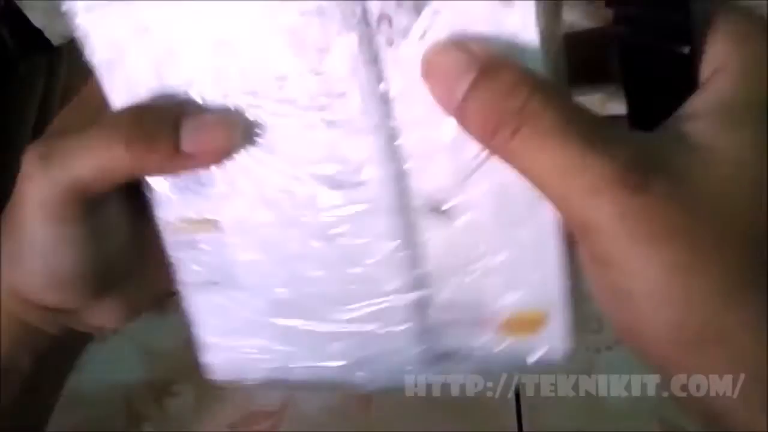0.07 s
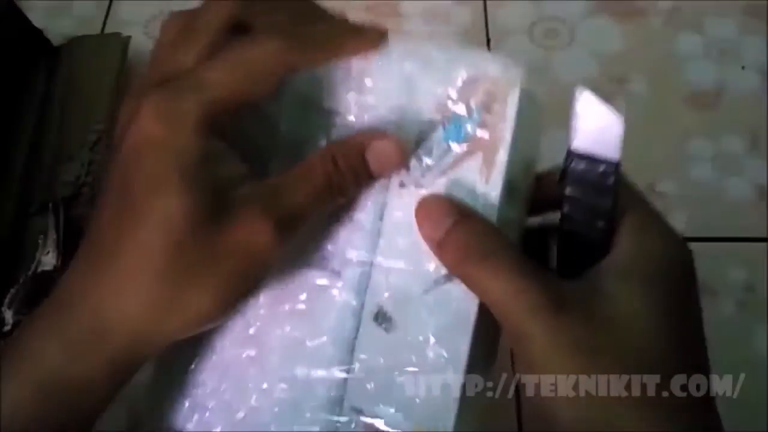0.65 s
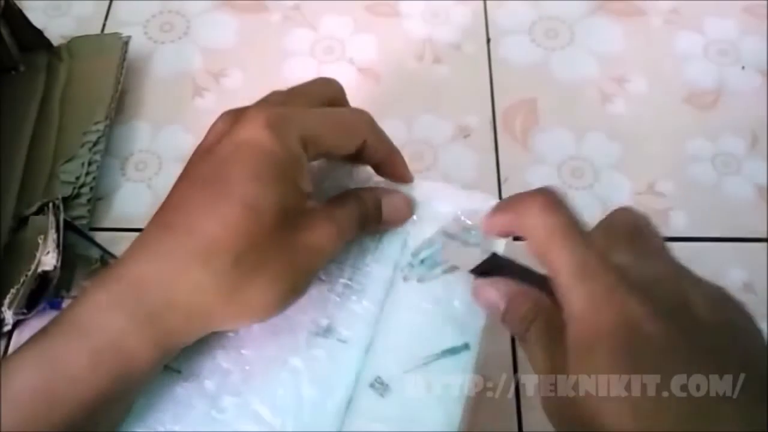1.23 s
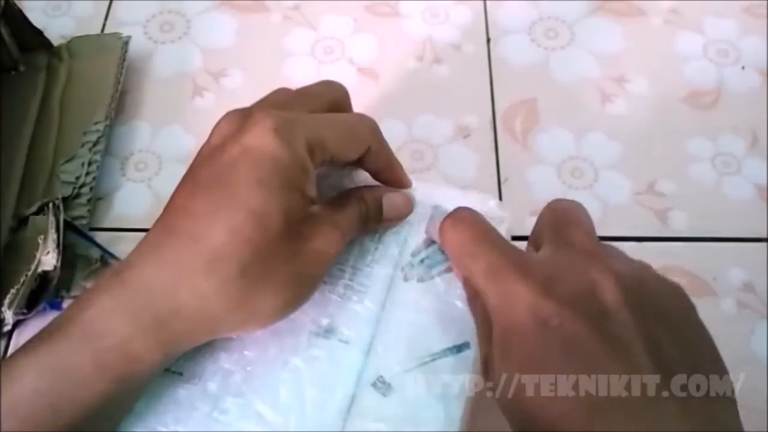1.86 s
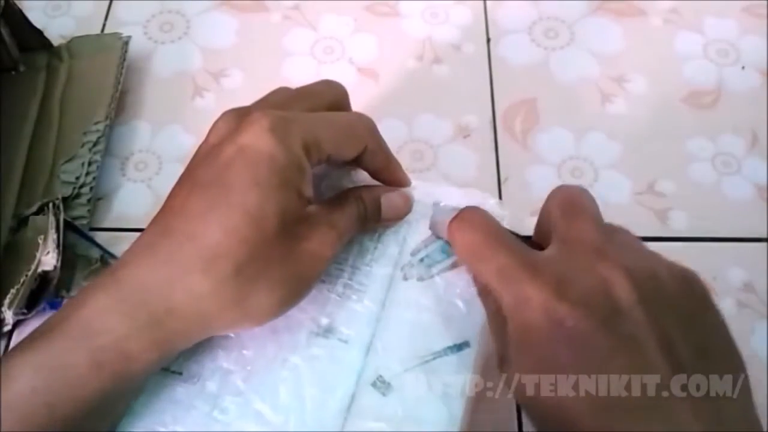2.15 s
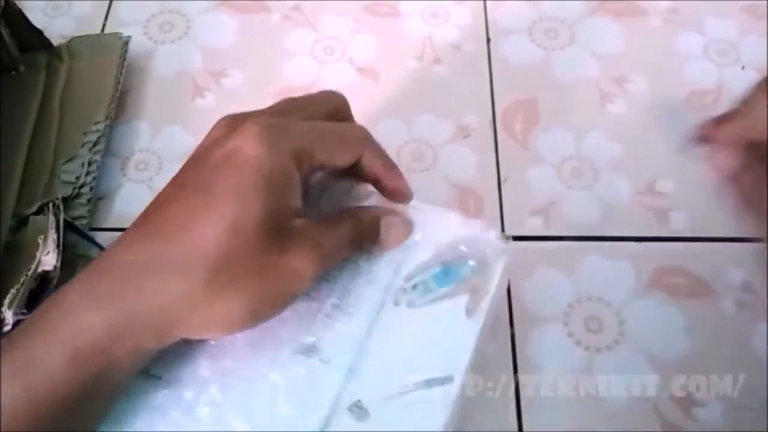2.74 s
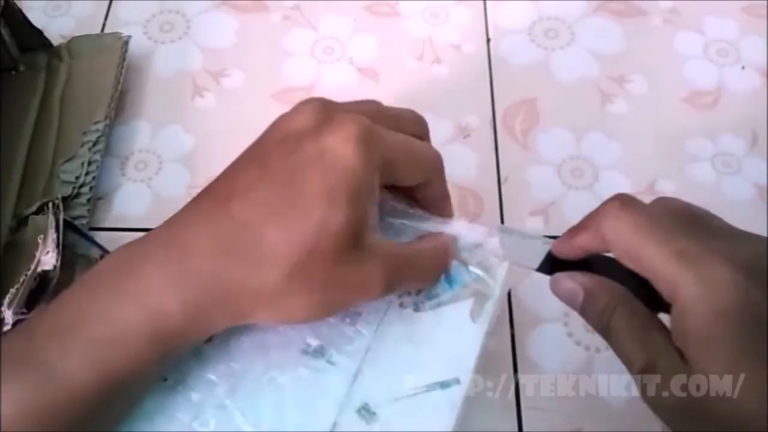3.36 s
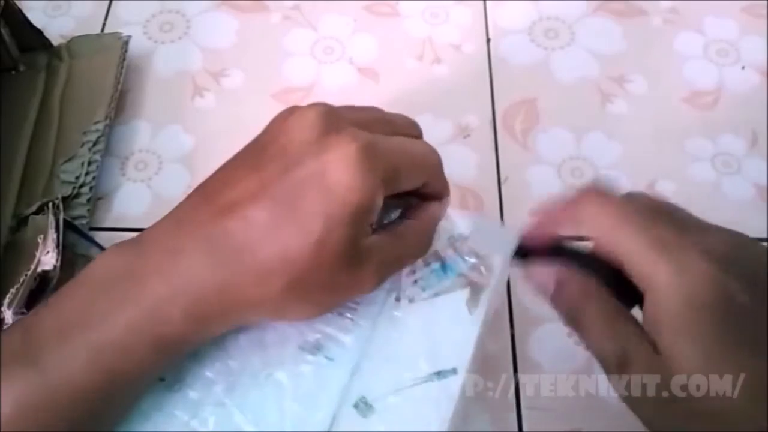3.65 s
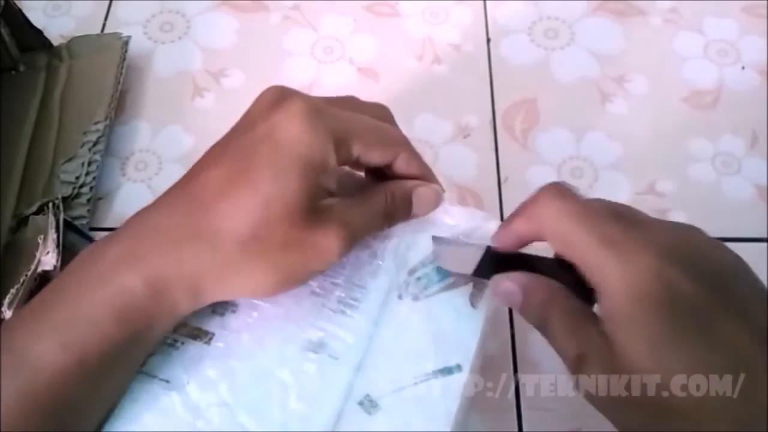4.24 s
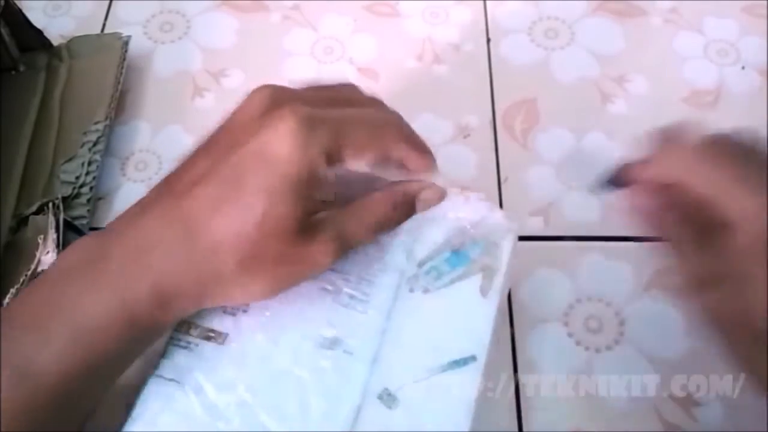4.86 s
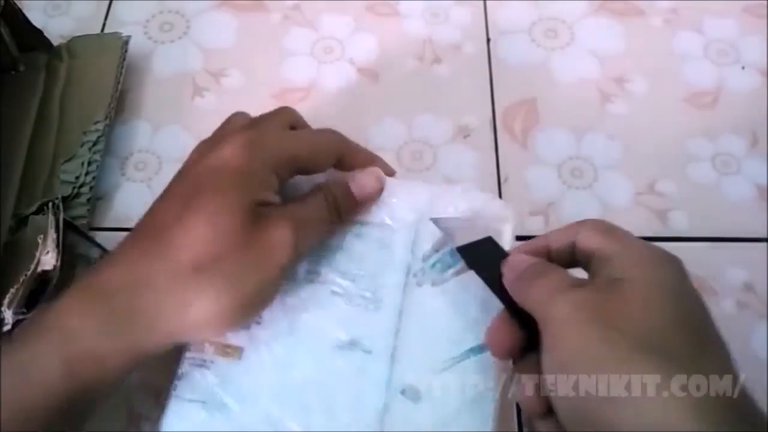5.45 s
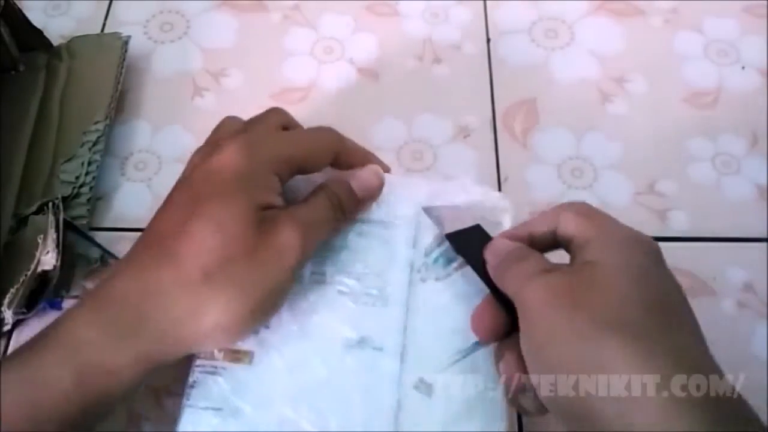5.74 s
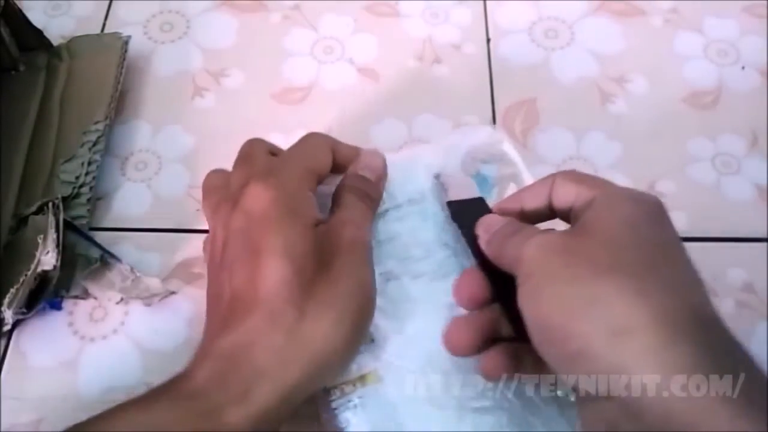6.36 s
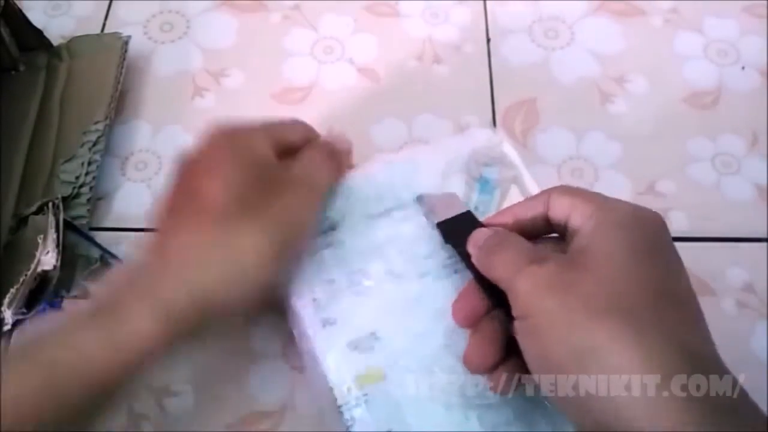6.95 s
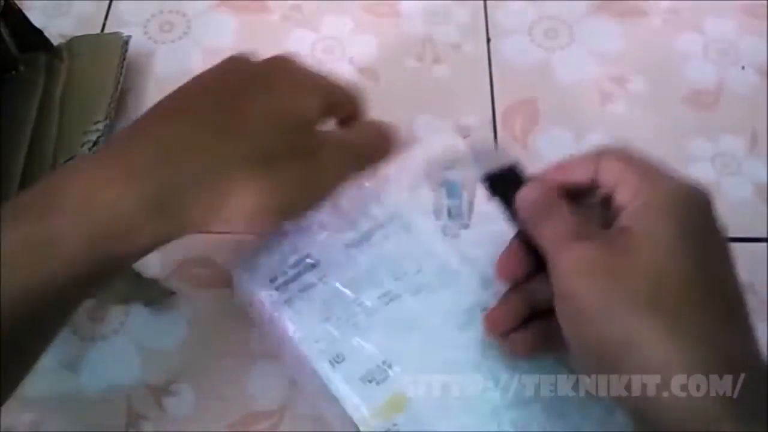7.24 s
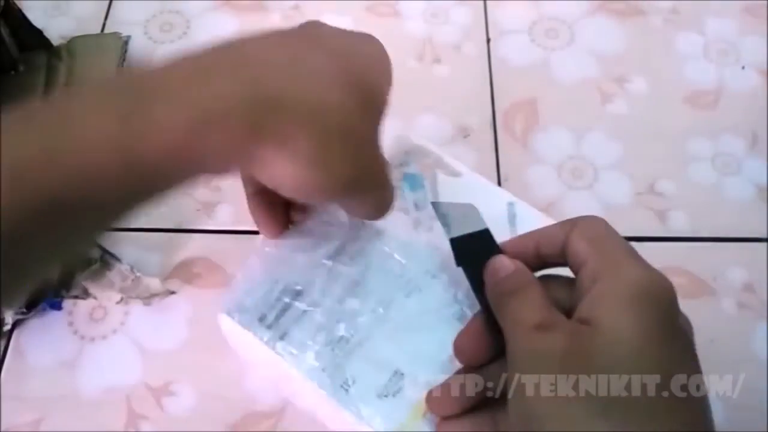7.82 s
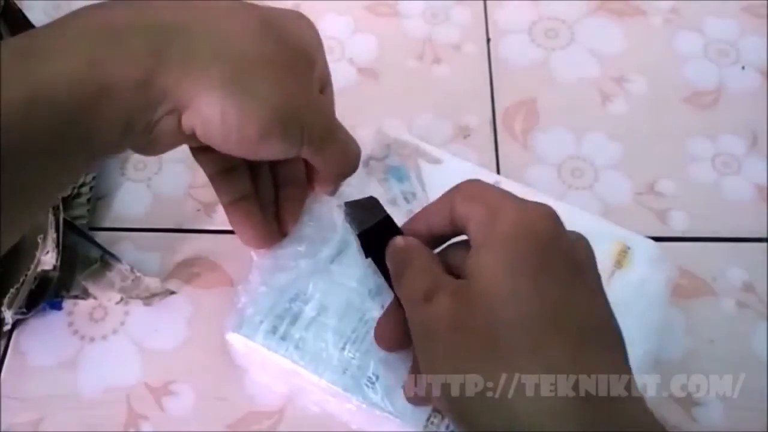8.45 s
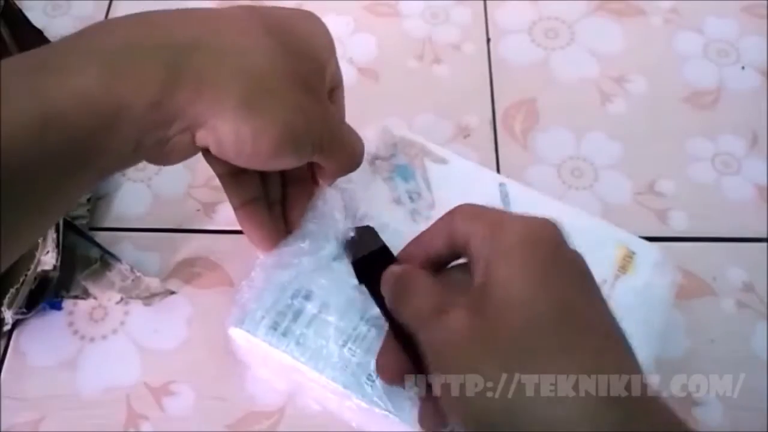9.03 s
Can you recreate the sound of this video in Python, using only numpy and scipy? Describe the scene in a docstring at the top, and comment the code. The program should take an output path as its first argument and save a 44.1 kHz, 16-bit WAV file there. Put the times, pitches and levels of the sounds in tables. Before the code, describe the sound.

Thin plastic wrap crackles in uneven bursts as a parcel is gripped and bumped in a small, hard-walled room. A knife blade sticks and slips through it in brief rasps, and bubbles burst with bright cracks. After a quieter stretch of rubbing and ticking, more pops come with dull knocks from the box. The handling is close, over a faint rumble of distant traffic.

```python
"""Slitting a bubble-wrapped parcel

Hands turn a parcel on a tiled floor and cut its wrap with a craft knife, close to a phone.
The film crinkles, snaps as creases flip and pops as it bursts. The blade sticks and slips in short
rasping strokes, the box thuds, and a small hard room rings. An engine and traffic drone far outside."""
import sys
import numpy as np
from scipy import signal
from scipy.fft import rfft, irfft, next_fast_len
from scipy.io import wavfile
from scipy.ndimage import map_coordinates

SR = 44100
rng = np.random.default_rng(int(sys.argv[2]) if len(sys.argv) > 2 else 0)


def to_wav(s):
    """Save 16-bit WAV."""
    ch = np.atleast_2d(s).T  # columns
    pcm = np.round(np.clip(ch, -1, 1) * 32767)  # PCM
    wavfile.write(sys.argv[1], SR, pcm.astype(np.int16))


N = 400869

TOP_HZ = 13080
LEAD_IN_S = 0.004  # faint hiss before a crack
# film crack: (frequency [Hz], level [dB])
CRACK_SPECTRUM = [(150, -55), (2000, -10), (4000, -5), (6200, -0.5), (7300, 1), (10500, 3.5), (13000, 1)]
# hollow pop: (frequency [Hz], level [dB])
POP_SPECTRUM = [(80, -8.5), (250, -6.5), (700, -1), (1500, 1), (5000, -1.5), (11000, -31)]
# large creases flip: (time [s], relative crack level [dB])
CREASE_FLIPS = [(0.529, -34), (0.851, -23), (1.042, -23.5), (1.686, -35), (1.834, -33.5), (1.851, -27.5),
                (2.161, -30), (2.25, -31.5), (2.316, -29), (2.382, -29.5), (2.92, -31.5), (3.664, -30),
                (3.757, -29.5), (3.783, -26), (3.934, -31.5), (4.01, -27.5), (4.022, -28), (4.133, -29),
                (4.516, -25.5), (4.524, -25), (4.563, -39), (4.613, -32), (4.626, -30.5), (4.695, -19.5),
                (4.774, -28), (5.146, -30), (6.464, -37), (6.538, -30), (6.619, -33), (7.514, -34),
                (7.622, -21), (7.895, -27), (8.002, -24.5), (8.382, -30), (8.713, -20), (8.953, -32.5),
                (8.971, -32)]
# wrap bursts: (time [s], relative crack level [dB], relative pop level [dB], tear time [s], pitch [Hz])
WRAP_BURSTS = [(0.323, -15, -38.5, 0.0011, 3900), (2.604, -13, -28, 0.0012, 2827),
               (2.89, -30, -43.5, 0.003, 2400), (3.453, -12.5, -27, 0.0013, 2600),
               (6.134, -31, -51, 0.0018, 2250), (6.532, -27.5, -39, 0.00085, 2280),
               (6.811, -24.5, -41.5, 0.00055, 3730), (6.827, -25.5, -37.5, 0.0015, 1630),
               (7.613, -16.5, -36, 0.00057, 3150), (7.731, -15.5, -41, 0.0016, 2810),
               (7.74, -15, -50.5, 0.00046, 3950), (8.027, -23, -37.5, 0.00058, 1880),
               (8.704, -20.5, -31, 0.00043, 2050), (8.72, -24.5, -47.5, 0.0029, 1966),
               (9.042, -29.5, -43, 0.00098, 3350)]


def amp(db):
    """Decibels to gain."""
    return 10 ** (np.asarray(db) / 20)


def unit(x):
    """Scale to rms 1."""
    return x / np.sqrt(np.mean(x ** 2) + 1e-20)


def along(points, hz):
    """Interpolate (Hz, value) points on a log axis."""
    f, v = np.transpose(points)
    return np.interp(np.log(hz + 1), np.log(f + 1), v)


def curves(rows):
    """One value per sample for each column after the time."""
    s, *cols = np.transpose(rows)
    return [np.interp(np.arange(N) / SR, s, c) for c in cols]


def wobble(knots_per_s):
    """Smooth random curve."""
    knots = rng.standard_normal(int(N * knots_per_s / SR) + 4)
    return map_coordinates(knots, [np.arange(N) * knots_per_s / SR])


def colour(x, spectrum, size=2048):
    """Minimum-phase filter with the given spectrum."""
    cepstrum = irfft(np.log(amp(along(spectrum, np.fft.rfftfreq(size, 1 / SR)))))
    cepstrum[1:size // 2] *= 2
    cepstrum[size // 2 + 1:] = 0
    impulse = irfft(np.exp(rfft(cepstrum)))
    return signal.fftconvolve(x, impulse[None], axes=1)[:, :x.shape[1]]


def resonate(x, modes):
    """Pass x through resonances: (frequency [Hz], width [Hz], level [dB])."""
    size = next_fast_len(x.shape[1] + SR // 2)
    f = np.fft.rfftfreq(size, 1 / SR)
    body = sum((-1) ** k * amp(db) * 1j * f * width / (hz * hz - f * f + 1j * f * width)
               for k, (hz, width, db) in enumerate(modes))
    return irfft(rfft(x, size) * body, size)[:, :x.shape[1]]


def add(track, s, x):
    """Mix x into the track from time s."""
    start = max(round(s * SR), 0)
    track[:, start:start + x.shape[1]] += x[:, :N - start]


def grains(length, per_s, spread_db):
    """Tiny random slips, mostly weak, different at each microphone."""
    strength = amp(spread_db * np.minimum(rng.exponential(size=length), np.pi))
    slipping = rng.random(length) < per_s / SR
    return unit(slipping * strength * rng.standard_normal((2, length)))


def burst(spectrum, life_s, uneven_db=3, bands=40, size=1024):
    """Flurry of clicks with its own uneven resonances, slightly later on the right."""
    t = np.arange(size) / SR
    flurry = rng.standard_normal((1, size)) * t ** 2 * np.exp(-t / life_s)
    hz = np.geomspace(200, TOP_HZ, bands)
    band_db = along(spectrum, hz) + uneven_db * rng.standard_normal(bands)
    left = colour(flurry, [spectrum[0], *zip(hz, band_db)])[0]
    right = np.roll(left, rng.integers(2, 12))
    return np.array([left, right]) * np.sqrt(SR / 1000) / np.linalg.norm(left)


def in_room(x, left_db, wet_db, wall_s=0.0015):
    """Panned direct sound plus the tiled room's diffuse tail."""
    # room decay: (frequency [Hz], t60 [s])
    room_t60 = [(150, 0.29), (1000, 0.38), (4000, 0.31), (9000, 0.37), (14000, 0.27)]
    hz, t, noise = signal.stft(rng.standard_normal((2, SR // 2)), SR, nperseg=256)
    decay = amp(-60 * t / along(room_t60, hz)[:, None])
    onset = np.clip(t / wall_s - .5, 0, 1)
    tail = signal.istft(noise * decay * onset, SR)[1]
    out = amp(wet_db) * signal.fftconvolve(x, tail / np.linalg.norm(tail[0]), axes=1)
    out[:, :x.shape[1]] += x * amp([[left_db / 2], [-left_db / 2]])
    return out


def moving_in_room(x, left_db, wet_db, block=16384):
    """The sound wanders with the hands: a new room tail for each block."""
    out = np.zeros((2, N))
    for i in range(0, N, block):
        add(out, i / SR, in_room(x[:, i:i + block], left_db, wet_db))
    return out


def effort(attack_s=0.019, release_s=0.015, settle_db=-19.5, settle_s=0.062):
    """Flex and rub in dB: grips swell, hold and let go; the film settles after each crack."""
    # hand grips: (time [s], length [s], relative crinkle level [dB], relative rub level [dB])
    grips = [(0, 1, -55.5, -64.5), (0.5, 0.46, -50, -54.5), (1.143, 0.74, -57, -62.5),
             (2.235, 0.87, -59, -59.5), (2.733, 0.99, -55.5, -60.5), (3.533, 0.16, -41, -67.5),
             (3.771, 0.102, -48.5, -74), (3.983, 0.17, -47, -63), (4.498, 0.25, -50, -68.5),
             (4.778, 0.06, -32, -46), (5.262, 0.72, -63, -90), (5.974, 0.4, -51.5, -61.5),
             (6.393, 0.34, -57, -85), (6.878, 0.46, -52.5, -63), (7.457, 0.77, -54, -57),
             (7.505, 0.061, -44, -60.5), (7.763, 0.064, -38.5, -46), (8.188, 0.537, -63.5, -65),
             (8.95, 0.15, -51, -55.5)]
    t = np.arange(N) / SR
    flex_power, rub_power = np.full(N, amp(-63) ** 2), np.full(N, amp(-67.5) ** 2)  # parcel merely held
    for s, length_s, crinkle_db, rub_db in grips:
        release = np.exp(-np.clip((t - s - length_s) / release_s, 0, 20))
        hold = np.clip((t - s) / attack_s, 0, 1) * release
        flex_power += (amp(crinkle_db) * hold) ** 2
        rub_power += (amp(rub_db) * hold) ** 2
    settling = np.exp(-t[:SR] / settle_s)
    for s, crack_db, *_ in CREASE_FLIPS + WRAP_BURSTS:
        add(flex_power[None], s, (amp(crack_db + settle_db) * settling[None]) ** 2)
    return 10 * np.log10(flex_power), 10 * np.log10(rub_power)


def roughen(x, depth_db=3.5):
    """Random louder and softer patches in the spectrum roughen the sound."""
    spectra = signal.stft(x, nperseg=256)[2]
    patch = np.outer(np.hanning(10), np.hanning(20))
    field = signal.fftconvolve(rng.standard_normal(spectra.shape[1:]), patch, "same")
    return signal.istft(spectra * amp(depth_db * unit(field)))[1][:, :x.shape[1]]


def ticks(flex_db):
    """Small creases flip at random, faster and harder with more flex."""
    out = np.zeros((2, N))
    chance, excess_db = rng.random(N), rng.uniform(2, 9, N)
    per_s = 400 * amp(flex_db / 2)
    for i in np.flatnonzero(chance < per_s / SR):
        add(out, i / SR, amp(flex_db[i] + excess_db[i]) * burst(CRACK_SPECTRUM, life_s=.0005))
    return moving_in_room(out, left_db=-1, wet_db=1)


def handling():
    """The film crinkles and ticks while fingers rub over it."""
    # finger rub: (frequency [Hz], level [dB])
    rub_spectrum = [(100, 4.5), (280, 0), (550, 3.5), (900, 3), (1130, -0.5), (3000, -1.5), (7000, -10)]
    flex_db, rub_db = effort()
    crinkle = roughen(colour(grains(N, per_s=1400, spread_db=3), CRACK_SPECTRUM))
    crinkle = unit(crinkle) * amp(flex_db - 4.5 + 4.4 * wobble(25))
    crinkle = moving_in_room(crinkle, left_db=1, wet_db=0)
    rub = roughen(colour(grains(N, per_s=900, spread_db=1), rub_spectrum))
    rub = unit(rub) * amp(rub_db + 3.66 * wobble(12))
    return ticks(flex_db) + crinkle + moving_in_room(rub, left_db=-1.5, wet_db=3)


def engine():
    """A far engine slows, pulls away and fades; uneven firing makes it waver."""
    # engine drone: (time [s], firing rate [Hz], level [dB])
    drone = [(0, 148, -49), (1.1, 149.3, -50.5), (1.37, 145.8, -58.5), (1.5, 132.3, -45.5),
             (1.7, 127.8, -55.5), (2.1, 114.7, -59), (2.55, 168.8, -52.5), (3.2, 150.5, -77)]
    firing_hz, level_db = curves(drone)
    phase = 2 * np.pi * np.cumsum(firing_hz * (1 + .035 * wobble(40))) / SR
    return amp(level_db + 3 * wobble(18)) * np.sin(phase)


def traffic(street_db=-64):
    """Far vehicles swell and fade over the street's steady rumble."""
    # vehicles: (time nearest [s], half passing time [s], rumble [dB], tyre hiss [dB], exhaust hum [dB])
    passes = [(0.3, 0.57, -52, -66, -74), (2.1, 1.19, -59.5, -64, -66.5), (8.151, 0.47, -58, -58.5, -57.5)]
    # street rumble: (frequency [Hz], level [dB])
    rumble_spectrum = [(20, -18.5), (85, -4.5), (125, 8), (155, 2.5), (220, -7), (500, -17), (1500, -30),
                       (6000, -37)]
    # tyre and exhaust resonances: (frequency [Hz], width [Hz], level [dB])
    tyre_modes = [(1120, 180, 0)]
    exhaust_modes = [(271.3, 4.5, 6.5), (408, 92, -7)]
    t = np.arange(N) / SR
    power = sum(amp(dbs)[:, None] ** 2 * np.exp(-((t - s) / half_s) ** 2) for s, half_s, *dbs in passes)
    rumble_gain, tyre_gain, hum_gain = np.sqrt(power)
    mid, side = colour(rng.standard_normal((2, N)), rumble_spectrum, size=8192) * amp([[0], [-9]])
    rumble = unit(np.array([mid + side, mid - side])) * np.hypot(rumble_gain, amp(street_db))
    tyres = unit(resonate(rng.standard_normal((2, N)), tyre_modes)) * tyre_gain
    hum = unit(resonate(rng.standard_normal((2, N)), exhaust_modes)) * hum_gain
    return rumble + tyres + hum


def bumps(lean_from_s=5.2, free_db=-21.5, leaning_db=-3, push_s=0.0037):
    """The padded box thuds at knocks and at punctures, which jolt it harder once it leans."""
    # knocks on hands and floor: (time [s], relative level [dB])
    knocks = [(0.101, -43.5), (0.33, -37.5), (0.404, -31.5), (6.14, -55), (8.707, -37.5)]
    # padded box: (frequency [Hz], width [Hz], level [dB])
    thud_modes = [(255, 37, 2.1), (434, 270, -2.1)]
    out = np.zeros((2, N))
    t = np.arange(SR // 10) / SR
    jolts = [(s, pop_db + (leaning_db if s > lean_from_s else free_db))
             for s, _, pop_db, *_ in WRAP_BURSTS]
    for s, db in knocks + jolts:
        push = rng.standard_normal((1, len(t))) * np.exp(-t / push_s)
        thud = unit(resonate(push, thud_modes)) * np.ones((2, 1))
        add(out, s, amp(db - 14) * in_room(thud, left_db=-2, wet_db=3.5))
    return out


def crack(crack_db, life_s, wet_db, lead_in_db=-10):
    """A faint, short hiss leads into a bright crack."""
    click = burst(CRACK_SPECTRUM, life_s, uneven_db=2)
    click = np.pad(click, ((0, 0), (round(LEAD_IN_S * SR), 0)))
    add(click, 0, amp(lead_in_db) * burst(CRACK_SPECTRUM, life_s=LEAD_IN_S / 2))
    return amp(crack_db - 1.5) * in_room(click, left_db=7.5, wet_db=wet_db)


def pop(pop_db, life_s):
    """Hollow pop of the air and card under the film."""
    return amp(pop_db + 11.5) * in_room(burst(POP_SPECTRUM, life_s, uneven_db=1), left_db=2, wet_db=3)


def ring(crack_db, life_s, hz):
    """The released film rings briefly in its two lowest membrane modes."""
    blow = burst(POP_SPECTRUM, life_s, uneven_db=4.5)
    width_hz = 0.094 * hz
    tone = resonate(blow, [(hz, width_hz, 0), (1.66 * hz, width_hz, -4)])
    tone *= np.linalg.norm(blow) / np.linalg.norm(tone)
    return amp(crack_db - 9.5) * in_room(tone, left_db=4, wet_db=1)


def punctures():
    """Stretched wrap gives way: crack, pop and ring."""
    out = np.zeros((2, N))
    for s, crack_db, pop_db, tear_s, film_hz in WRAP_BURSTS:
        add(out, s - LEAD_IN_S, crack(crack_db, tear_s, wet_db=-2))
        add(out, s, pop(pop_db, tear_s) + ring(crack_db, tear_s, film_hz))
    return out


def blade(fall_per_rise=1.38, judder_db=3, judder_per_s=130):
    """The blade sticks and slips through taut film; pressed on the box, it rings the card."""
    # cuts: (peak time [s], rise [s], relative level [dB], card share [0-1], film pitch [Hz])
    strokes = [(0.361, 0.02, -36.5, 0.04, 3860), (1.0, 0.058, -35, 0.07, 1080),
               (1.068, 0.0067, -38, 0, 1140), (2.595, 0.0025, -23.5, 0.14, 2870),
               (3.113, 0.0017, -41, 1, 891), (3.225, 0.0024, -35, 0.9, 890),
               (3.268, 0.0018, -27.5, 0.46, 1090), (3.348, 0.028, -24, 0.4, 3270),
               (3.462, 0.011, -33.5, 1, 710), (4.83, 0.021, -31, 0.08, 1790), (5.42, 0.078, -54, 0, 4600),
               (6.661, 0.015, -48, 0, 1390), (7.137, 0.0075, -51, 0.1, 1643),
               (8.981, 0.015, -51.5, 0, 2206)]
    # blade rasp: (frequency [Hz], level [dB])
    rasp_spectrum = [(100, -38), (300, -10.5), (700, -6), (1300, -44), (1900, -3), (3300, -5.5),
                     (6000, -20.5), (9000, -9.5), (13000, -16.5)]
    # hollow box: (frequency [Hz], width [Hz], level [dB])
    card_modes = [(677, 200, 1.5), (793, 170, 7), (1127, 84, 1.5), (1210, 140, -1.5), (3020, 710, -22.5)]
    out = np.zeros((2, N))
    t = np.arange(SR) / SR - 1 / 4
    for s, rise_s, db, card_share, film_hz in strokes:
        # force swells, then falls as the film yields
        force = np.where(t < 0, np.exp(-(t / rise_s) ** 2 / 2), np.exp(-abs(t) / (fall_per_rise * rise_s)))
        slips = grains(len(t), per_s=14000, spread_db=2) * force
        slips *= amp(judder_db * wobble(judder_per_s)[:len(t)])
        film_tone = unit(resonate(slips, [(film_hz, 0.67 * film_hz, 0)]))
        film = unit(unit(colour(slips, rasp_spectrum)) + 4.1 * film_tone)
        card = unit(resonate(slips, card_modes)) * amp([[-2.5], [2.5]])  # nearer the right microphone
        rasp = np.sqrt(1 - card_share) * film + np.sqrt(card_share) * card
        add(out, s + t[0], amp(db) * np.std(force) * in_room(rasp, left_db=2.5, wet_db=0))
    return out


def creases():
    """Each large crease flips with one thin crack."""
    out = np.zeros((2, N))
    for s, db in CREASE_FLIPS:
        add(out, s - LEAD_IN_S, crack(db, life_s=0.00085, wet_db=-6))
    return out


def squeaks():
    """Two thin, wavering squeaks, one mid-pitched and one very high, swell and fade."""
    # squeaks: (peak time [s], swell time [s], pitch [Hz], level [dB])
    tones = [(2.125, 0.02, 1112, -54), (6.273, 0.02, 12680, -40.5)]
    out = np.zeros((2, N))
    t = np.arange(N) / SR
    for s, swell_s, hz, db in tones:
        phase = 2 * np.pi * np.cumsum(hz + 20 * wobble(200)) / SR
        out += amp(db) * np.exp(-abs(t - s) / swell_s) * np.sin(phase)
    return in_room(out, left_db=-2, wet_db=0)[:, :N]


def scene():
    """Parcel work over the street's drone."""
    return creases() + punctures() + handling() + blade() + squeaks() + bumps() + engine() + traffic()


def record(dry):
    """The left microphone's port rings in the treble; the phone cuts off above TOP_HZ."""
    # port response: (frequency [Hz], gain [dB])
    left_port = [(5500, -1), (7000, 2.5), (8600, 9), (10000, 5.5), (12500, -1.5)]
    heard = np.vstack([colour(dry[:1], left_port), dry[1:]])
    size = next_fast_len(N + SR // 2)
    hz = np.fft.rfftfreq(size, 1 / SR)
    passband = amp(-np.clip((hz - TOP_HZ) / 25, 0, 100))
    return irfft(rfft(heard, size) * passband, size)[:, :N]


dry = scene()
out = record(dry)
to_wav(out)
```